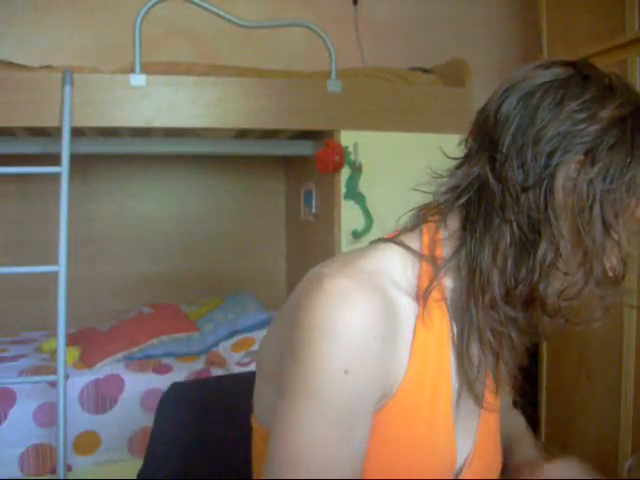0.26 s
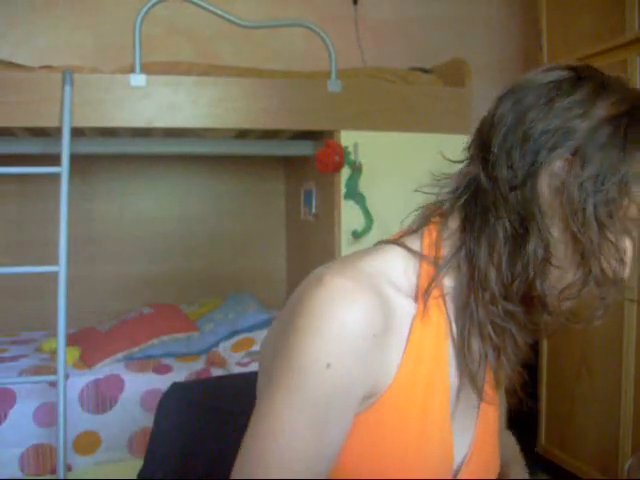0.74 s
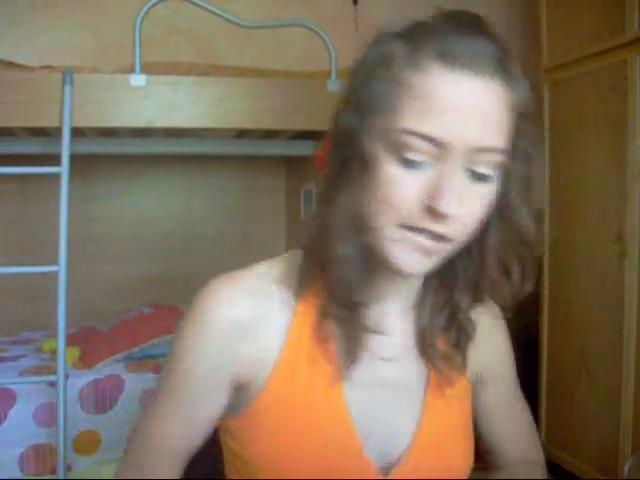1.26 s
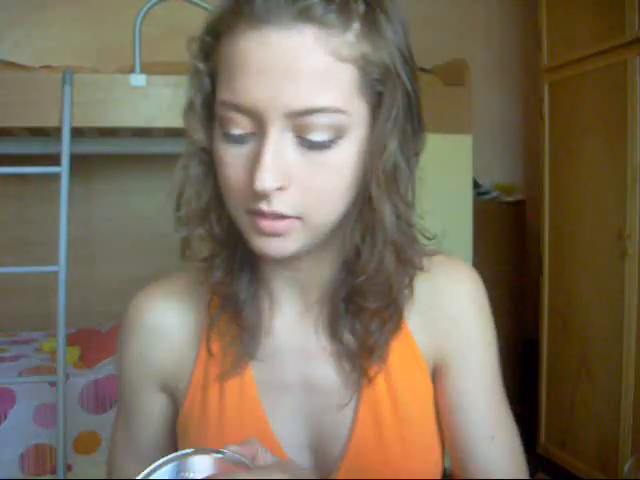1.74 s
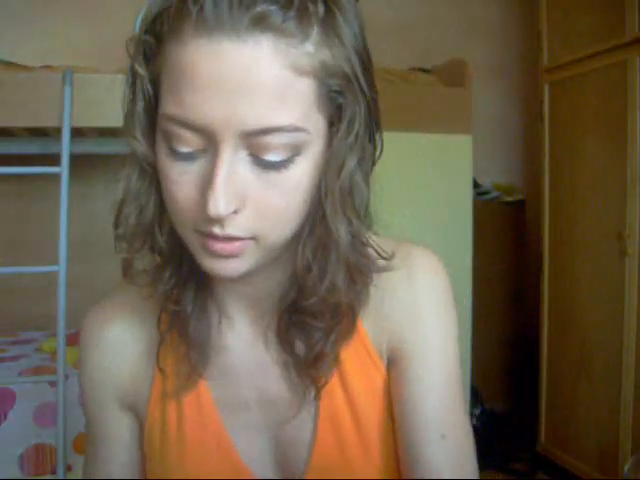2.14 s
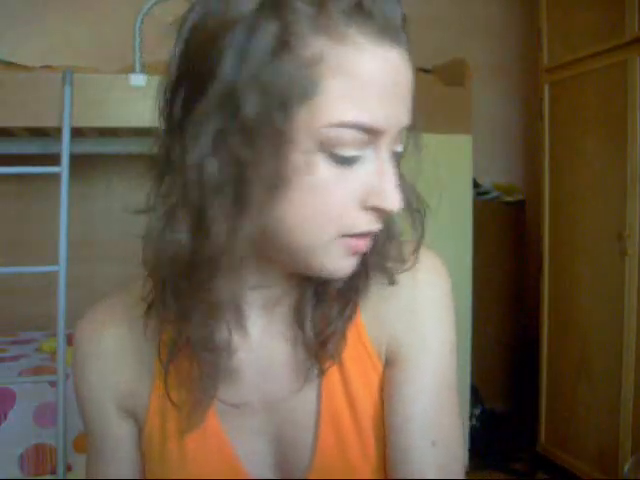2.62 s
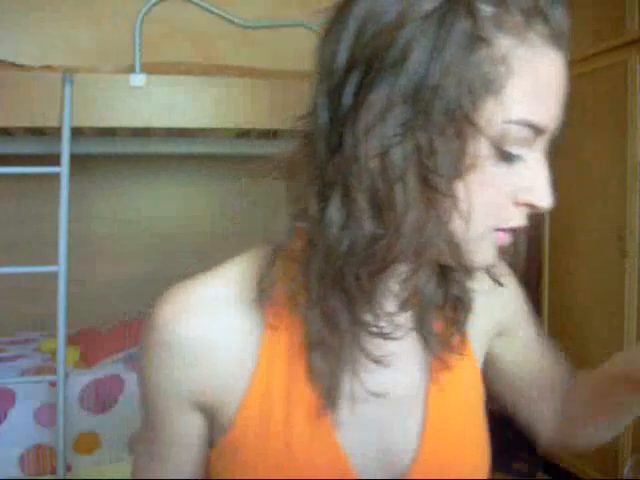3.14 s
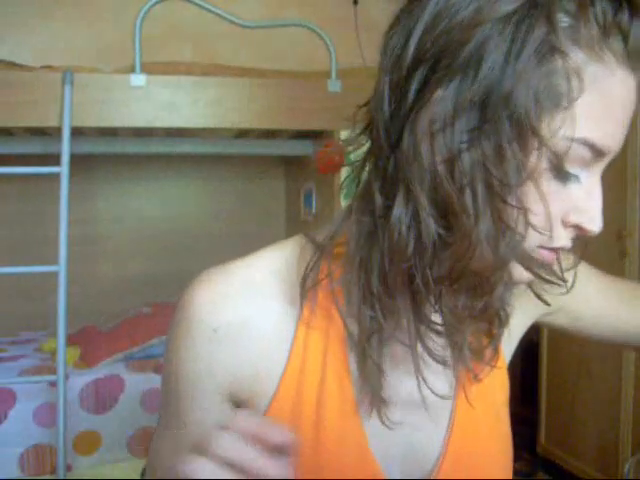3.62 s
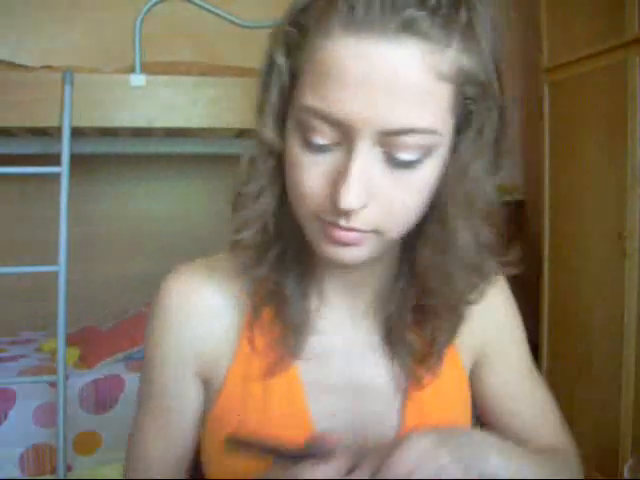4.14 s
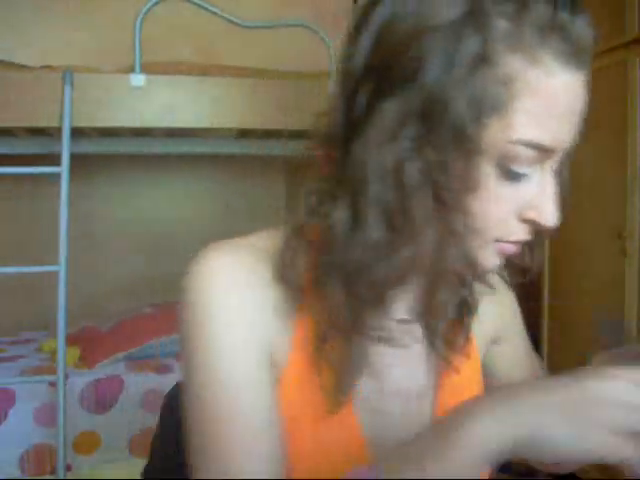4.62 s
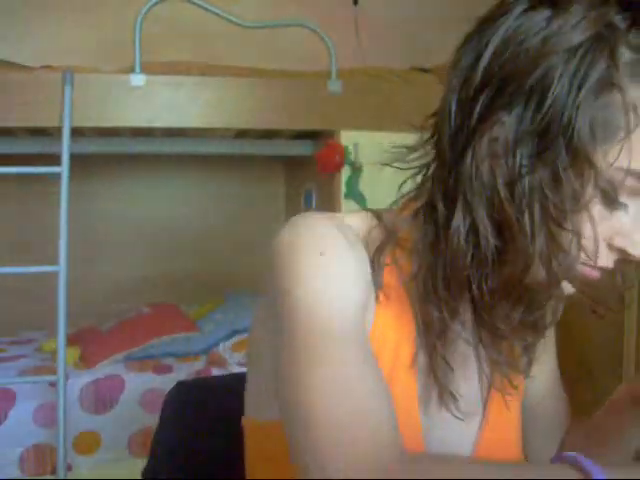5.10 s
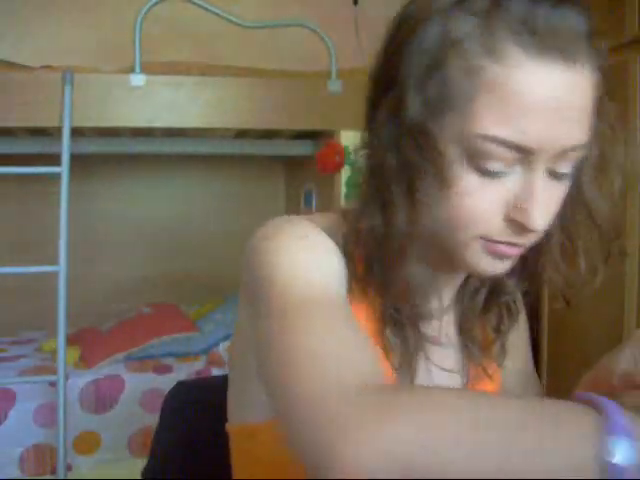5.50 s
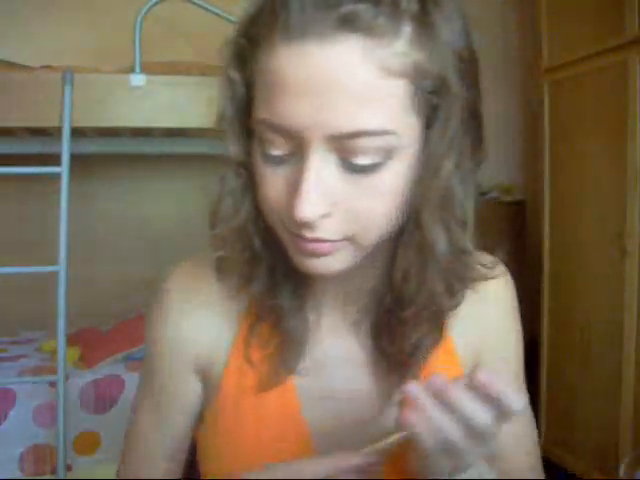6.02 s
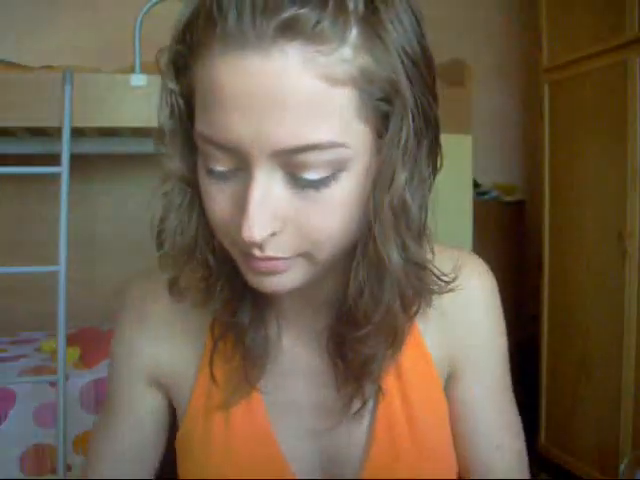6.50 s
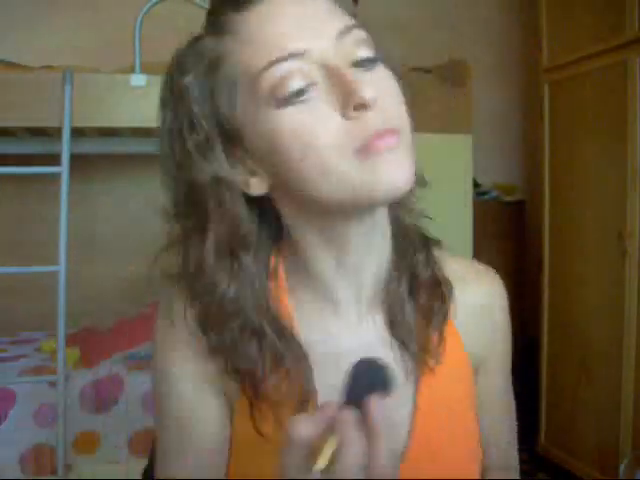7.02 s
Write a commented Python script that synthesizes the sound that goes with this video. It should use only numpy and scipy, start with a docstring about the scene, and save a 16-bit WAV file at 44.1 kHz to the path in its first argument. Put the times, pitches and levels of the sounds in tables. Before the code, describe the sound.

Light taps, then bursts of hard plastic knocks and rustling hands as cosmetics are sorted on a desk, ending in thin hiss and tiny ticks.

```python
"""Plastic cases on a desk

Small plastic cosmetic cases are picked up, knocked together and dropped on a desk in a small furnished bedroom.
Impacts are noise bursts with damped modes and room decay; rustling hands and cloth are grainy, filtered noise.
A small microphone with a sharp presence peak adds its hiss; faint short tones pass beneath.
Near the end the rustle stops, the background turns thinner and brighter, and a few very high ticks sound."""
import sys
import numpy as np
from scipy import signal
from scipy.fft import rfft, irfft, next_fast_len
from scipy.io import wavfile
from scipy.ndimage import uniform_filter1d, minimum_filter1d, map_coordinates

SR = 44100
rng = np.random.default_rng(int(sys.argv[2]) if len(sys.argv) > 2 else 0)


def digitize_waveform(pressure):
    """Quantize a signal to 16-bit integers and store it at the path in sys.argv[1].

    Rows of a 2-D input are taken as channels; values are limited to [-1, 1].
    """
    field = np.atleast_2d(pressure).T
    bounded = np.clip(field, -1, 1)
    quanta = np.round(bounded * 32767).astype(np.int16)
    wavfile.write(sys.argv[1], SR, quanta)


N = 320166  # length in samples

# Background spectra before and after the switch, relative levels: frequency_hz, density_db (per Hz)
AIR_SPECTRUM = [(15, -37.5), (25, -5), (363, -5.5), (560, -3), (641, -10), (714, -5), (2050, -11.5),
                (2910, -15), (14800, -21), (16000, -34.5)]
THIN_SPECTRUM = [(25, -34.5), (140, 0.5), (250, -10.5), (400, -3.5), (1300, -8.5), (2100, -4), (3000, -7.5),
                 (9000, -10.5), (12800, -5.5), (15000, -12), (16000, -16.5)]
# Strokes of the rummaging hands: peak_s, peak_db, swell_s (time for the last 10 dB of rise)
HAND_STROKES = [(.08, -64, .03), (0.361, -63.5, 0.26), (.86, -65.5, 0.2), (1.32, -63, .4), (1.91, -60, .11),
                (2.04, -67, 0.28), (2.86, -61, 0.15), (3.14, -46, 0.0261), (3.25, -54, 0.05),
                (3.63, -35.5, 0.025), (3.72, -44.5, 0.0334), (3.88, -56.5, 0.05), (4.05, -57.5, .05),
                (4.27, -64, 0.12), (4.425, -50, 0.0151), (4.56, -46.5, 0.013), (4.65, -66, 0.2),
                (4.801, -56, 0.03), (4.86, -61, 0.07), (5.15, -35, 0.04), (5.35, -45, 0.1041),
                (5.46, -44, 0.0655), (5.53, -31, 0.05), (5.65, -35, 0.087), (5.9, -61.5, .1),
                (6.1, -56.5, .014), (6.135, -51, 0.0346), (6.2, -48, 0.0453), (6.235, -48, .02),
                (6.29, -63.5, 0.13), (6.38, -58.5, 0.08), (6.418, -50.5, 0.03)]
# Colour of the rustle as the microphone hears it, relative levels: frequency_hz, level_db
RUSTLE_COLOUR = [(200, -39), (1000, -20), (2000, -10), (2700, -3.5), (3400, 0), (3900, -11), (4600, -16),
                 (6300, -27), (11000, -45.5)]
# Light fingertip taps on the cases, before blow colour: start_s, level_db, case_hz, case_db (re level_db)
FINGER_TAPS = [(0.075, -39, 1120, -7), (0.5446, -40, 610, 6), (0.8692, -42, 940, -2),
               (1.1014, -32, 2000, -8.5), (1.722, -25.5, 1240, -8), (1.7419, -31.5, 1200, -15),
               (1.8956, -39, 1900, -30), (2.3372, -37, 2100, -7.5), (2.393, -41, 2010, -15),
               (2.6675, -30.5, 870, -7), (4.0795, -31, 1860, -7), (4.1121, -34, 2140, -26),
               (4.4029, -38, 2120, -19), (4.4287, -25, 1990, -27), (4.5595, -28.5, 1920, -14),
               (4.793, -37, 1160, -4), (5.885, -32.5, 2040, -3.5), (5.9105, -29, 2044, -20.5),
               (5.9414, -28.5, 984, -19), (6.1784, -27.5, 2270, -32), (6.4681, -40, 1950, -4)]
# Cases hitting each other and the desk, before blow colour:
# start_s, level_db, chatter_s (60 dB decay), case_hz, case_db (re level_db)
CASE_KNOCKS = [(0.2948, -25.5, .025, 660, 5.5), (2.4332, 1.5, .01, 1606, -8.5),
               (2.4437, -14, .012, 1020, -0.5), (3.0003, -8, .013, 3400, -4), (3.037, -16, .023, 2900, -4),
               (3.0422, -20.5, .036, 1150, 2.5), (3.054, -18, .02, 2980, -7),
               (3.0977, -18.5, 0.036, 1750, -9), (3.1029, -11, .02, 3200, -7),
               (3.1181, -12.5, .022, 1730, -15), (3.127, -28, .02, 1250, 6.5),
               (3.1883, -15, .012, 1780, -33), (3.5297, -31, .025, 556, 9.5), (3.5592, -18, .037, 3350, -6),
               (3.5748, -10, .032, 2050, -10), (3.6013, -8, .048, 1700, -11), (3.6058, -1, .02, 2050, -10),
               (3.6145, -7, .02, 2090, -14), (3.6456, -8, .03, 3400, -8), (3.6584, -4, .011, 1930, -10.5),
               (3.6664, -10.5, .036, 1760, -5), (3.686, -5, .022, 1866, -6.5), (4.8594, -39, .018, 654, 7),
               (5.0444, -15, .035, 1120, -1), (5.07, -9.5, .06, 1480, -2), (5.0895, 5.5, .023, 1300, -24),
               (5.0947, 6, .03, 1640, -8.5), (5.1032, -6.5, .029, 1460, -24), (5.114, -7, .02, 1760, -12),
               (5.1819, -9.5, .044, 1710, -4), (5.1937, -5.5, .029, 1780, -25),
               (5.2028, 2.5, .031, 1020, -9), (5.3327, -24, .035, 1580, -3), (5.3815, -29, .013, 1080, -1),
               (5.397, -24.5, .034, 1060, -1), (5.4331, -14, .026, 1002, -9), (5.4911, -16, .04, 1340, -6),
               (5.5144, -19, .03, 760, -3.5), (5.5366, -9.5, .052, 1420, -2.5), (5.58, -11, .02, 1370, -5),
               (5.6015, -8, .015, 4200, -2), (5.604, 5.5, .026, 1170, -18), (5.6168, -5, .029, 1400, -5.5),
               (5.627, -6, .02, 3130, -12), (5.6394, -12.5, .028, 750, -2.5), (5.662, -6.5, .032, 1220, -5)]
# Hardness and weight of each handful, in force from start_s until the next row:
# start_s, edge_db (added treble), body_db (gain of the crack's low part), tray_db (re knock level)
HANDFUL_TRAITS = [(0, -4, 4, -11), (2.4, 9, 1, -30.5), (2.9, -12, -9, -22), (3.5, 8, 0, -22),
                  (5, 8.5, 0.5, -26), (5.3, 6, -2, -18)]
# Modes of the tray that holds the cases: frequency_hz, level_db, t60_s
TRAY_MODES = [(400, 5, 0.022), (763.3, -4, 0.066), (1070, 0, .03)]
# Reverberation time of the room: frequency_hz, t60_s
ROOM_DECAY = [(150, 0.4), (1000, 0.32), (2800, .29), (7300, 0.22), (14000, 0.13)]
# Colour of a blow as the microphone hears it: frequency_hz, gain_db
BLOW_COLOUR = [(60, -39), (250, -24.5), (750, -8), (1400, -6.5), (2200, -4.5), (3400, 3), (3900, -10),
               (4600, -18), (6300, -32), (8700, -48.5), (11000, -58.5), (14500, -53.5), (16000, -50.5)]
# Faint short tones: start_s, length_s, pitch_hz, level_db
FAINT_TONES = [(.5, .3, 310, -71), (3.92, .2, 445, -72), (4.2, .1, 590, -72), (4.8, .17, 720, -68)]
# Weight landing on the desk top: start_s, level_db
DESK_THUDS = [(2.436, -40), (3.001, -39.5), (3.164, -48), (3.531, -55.5), (3.601, -52), (3.66, -49.5),
              (4.86, -56.5), (5.187, -41.5)]
# Modes of the desk top: frequency_hz, level_db, t60_s
DESK_MODES = [(193.8, 3.5, .13), (110, -11.5, 0.12), (310, 3.5, 0.043)]
# Very high ticks, before tick colour: start_s, level_db
HIGH_TICKS = [(6.6686, -39), (6.7751, -46), (6.9397, -35), (7.126, -43), (7.1797, -31), (7.2379, -49)]
# Colour of the high ticks: frequency_hz, gain_db
TICK_COLOUR = [(290, -35), (500, -25), (1400, -20), (1820, -38), (4730, -25), (11300, -11), (14200, -3.5),
               (16000, -22.5)]

AIR_DB, THIN_DB = -67, -66  # mean background levels
SWITCH_S = 6.634  # the background changes colour and the rustle stops
FADE_OVER_SWELL, RESTING_DB = 0.94, -76  # a stroke fades about as fast as it swells; hands at rest still stir
BODY_HZ = 2500  # the low part of a crack lies under this
CASE_T60_S, CASE_RISE_S = .013, 0.0003  # the rise also applies to the tray
KNOCK_ROOM_DB = -5.5
# Fingertips are soft and sound nearer, with less room; taps hardly move the tray
TAP_CHATTER_S, TAP_EDGE_DB, TAP_BODY_DB, TAP_TRAY_DB, TAP_ROOM_DB = .012, -1, -3, -30, -8
TOP_HZ = 15700  # band limit


def amp(db):
    """Decibel law: the amplitude ratio of a level."""
    return 10 ** (np.asarray(db) / 20)


def unit(x):
    """RMS normalisation: a signal is scaled to unit mean power."""
    return x / np.sqrt(np.mean(x ** 2) + 1e-20)


def along(points, hz):
    """Interpolation on a logarithmic frequency axis through (Hz, value) points."""
    f, v = np.transpose(points)
    return np.interp(np.log(hz + 1), np.log(f + 1), v)


def wobble(rate):
    """Band-limited random modulation: a smooth curve through rate random knots a second."""
    knots = rng.standard_normal(int(N * rate / SR) + 4)
    return map_coordinates(knots, [np.arange(N) * rate / SR])


def coloured(x, points):
    """Minimum-phase filtering: the folded cepstrum gives a causal filter with the gain of (Hz, dB) points."""
    size = 4096
    gain = amp(along(points, np.fft.rfftfreq(size, 1 / SR)))
    cepstrum = irfft(np.log(gain + 1e-6))
    cepstrum[1:size // 2] *= 2
    cepstrum[size // 2 + 1:] = 0
    response = irfft(np.exp(rfft(cepstrum)))
    return signal.fftconvolve(x, response)[:len(x)]


def ring(t, hz, t60):
    """Damped harmonic oscillation: a mode that dies 60 dB in t60."""
    return np.sin(2 * np.pi * hz * t) * amp(-60 * t / t60)


def background():
    """Stationary noise: room air and microphone hiss drift in level, and their spectrum switches at once."""
    air = unit(coloured(rng.standard_normal(N), AIR_SPECTRUM))
    thin = unit(coloured(rng.standard_normal(N), THIN_SPECTRUM))
    first = amp(AIR_DB + 1.0 * wobble(1.1)) * air
    last = amp(THIN_DB + .8 * wobble(12)) * thin
    return np.where(np.arange(N) < SWITCH_S * SR, first, last)


def hands():
    """Sliding friction: skin, cloth and plastic give noise roughened by dense grains, in swelling strokes."""
    t = np.arange(N) / SR
    power = amp(RESTING_DB) ** 2
    for peak_s, peak_db, swell_s in HAND_STROKES:
        distance = np.maximum(peak_s - t, (t - peak_s) / FADE_OVER_SWELL)
        power = power + amp(peak_db - 10 * distance / swell_s) ** 2
    grain_here = rng.random(N) < 1500 / SR  # about 1500 grains a second
    grains = grain_here * amp(2 * rng.exponential(size=N)) * rng.standard_normal(N)
    friction = rng.standard_normal(N) + .7 * unit(grains)
    rustle = unit(coloured(friction, RUSTLE_COLOUR))
    flutter = amp(1.5 * wobble(70))
    return np.sqrt(power) * flutter * rustle * (t < SWITCH_S)


def room_tail(length):
    """Diffuse reverberation: noise of unit energy in which each frequency decays at its own speed."""
    hz, t, z = signal.stft(rng.standard_normal(length), SR, nperseg=256)
    decay = amp(-60 * t / along(ROOM_DECAY, hz)[:, None])
    h = signal.istft(z * decay, SR, nperseg=256)[1]
    return h / np.linalg.norm(h)


def contact(t, chatter_s, case_hz, case_db, edge_db, body_db, tray_db):
    """Impact excitation: a brief chatter of noise sounds with the hollow modes of case and tray."""
    shape = amp(-60 * t / np.clip(chatter_s, .003, .2)) * (1 - np.exp(-t / 0.0013))
    # Uneven micro-bounces: a new random level every 40 samples
    bounce = amp(5 * rng.standard_normal(len(t) // 40 + 1)).repeat(40)[:len(t)]
    crack = np.diff(rng.standard_normal(len(t) + 1)) * shape * bounce
    # Strength is judged below the far treble
    crack = crack / np.linalg.norm(uniform_filter1d(crack, size=6)) * np.linalg.norm(shape)
    low_pass = signal.butter(2, BODY_HZ, fs=SR, output='sos')
    crack = crack + (amp(body_db) - 1) * signal.sosfiltfilt(low_pass, crack)  # light things crack thinly
    edge = np.diff(rng.standard_normal(len(t) + 3), 3) * shape  # harder corners add treble
    tray = sum(amp(db + rng.normal(0, 2)) * ring(t, hz, t60) for hz, db, t60 in TRAY_MODES)
    case = ring(t, case_hz, CASE_T60_S) + .35 * ring(t, case_hz * .6, CASE_T60_S)  # weaker lower tone
    hollow = (amp(case_db) * case + amp(tray_db) * tray) * (1 - np.exp(-t / CASE_RISE_S))
    return crack + hollow + amp(edge_db) * edge


def knocks():
    """Superposition of direct sound and reverberation: every tap and knock draws a new room response."""
    out, t = np.zeros(N + SR), np.arange(SR // 5) / SR
    contacts = []
    for s, db, case_hz, case_db in FINGER_TAPS:
        traits = (TAP_EDGE_DB, TAP_BODY_DB, TAP_TRAY_DB)
        contacts.append((s, db, TAP_ROOM_DB, (TAP_CHATTER_S, case_hz, case_db, *traits)))
    for s, db, chatter_s, case_hz, case_db in CASE_KNOCKS:
        traits = [rest for start_s, *rest in HANDFUL_TRAITS if start_s <= s][-1]
        contacts.append((s, db, KNOCK_ROOM_DB, (chatter_s, case_hz, case_db, *traits)))
    for s, db, room_db, settings in contacts:
        hit = amp(db) * contact(t, *settings)
        wet = amp(room_db) * signal.fftconvolve(hit, room_tail(SR // 3))
        i = round(s * SR)
        out[i:i + len(hit)] += hit
        out[i + 250:i + 250 + len(wet)] += wet  # the first walls answer after a few ms
    return coloured(out[:N], BLOW_COLOUR)


def tones():
    """Amplitude-modulated sinusoids: faint tones of steady pitch swell and fade."""
    t, out = np.arange(N) / SR, np.zeros(N)
    for s, length, hz, db in FAINT_TONES:
        swell = np.sin(np.pi * np.clip((t - s) / length, 0, 1)) ** .5
        out += amp(db) * swell * np.sin(2 * np.pi * hz * t)
    return out


def desk():
    """Modal vibration: landing weight makes the desk top boom softly in its lowest modes."""
    out, t = np.zeros(N + SR), np.arange(SR // 4) / SR
    for s, db in DESK_THUDS:
        boom = sum(amp(level) * ring(t, hz, t60) for hz, level, t60 in DESK_MODES)
        out[round(s * SR):][:len(t)] += amp(db) * boom * (1 - np.exp(-t / 0.003))
    return out[:N]


def ticks():
    """Two-stage exponential decay: short bright noise bursts, each with a weaker, longer tail."""
    out, t = np.zeros(N + SR), np.arange(SR // 8) / SR
    for s, db in HIGH_TICKS:
        shape = amp(-60 * t / 0.011) + amp(-4 - 60 * t / 0.073)
        out[round(s * SR):][:len(t)] += amp(db) * shape * rng.standard_normal(len(t))
    return coloured(out[:N], TICK_COLOUR)


def scene():
    """Linear superposition: all sources add into one channel."""
    return (background() + hands() + knocks() + tones() + desk() + ticks())[None]


def record(dry):
    """Peak limiting and band limitation: a quick gain dip holds peaks to full scale, then the top is cut."""
    needed = 1 / np.maximum(np.abs(dry), 1)
    gain = uniform_filter1d(minimum_filter1d(needed, size=129), size=128)
    m = next_fast_len(N + SR // 2)
    in_band = np.fft.rfftfreq(m, 1 / SR) < TOP_HZ
    return irfft(rfft(dry * gain, m) * in_band, m)[:, :N]


dry = scene()
out = record(dry)
digitize_waveform(out)
```